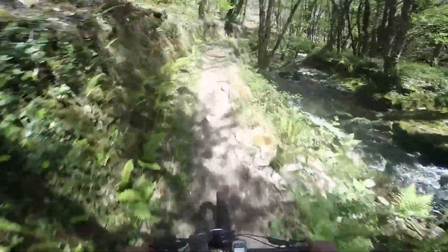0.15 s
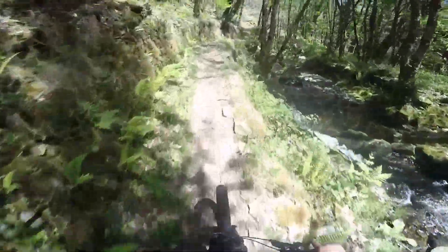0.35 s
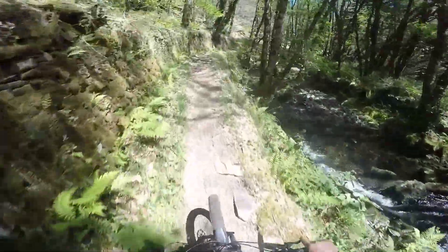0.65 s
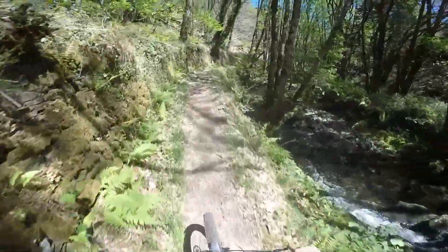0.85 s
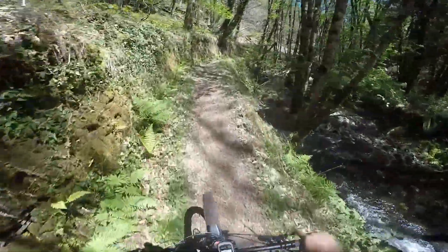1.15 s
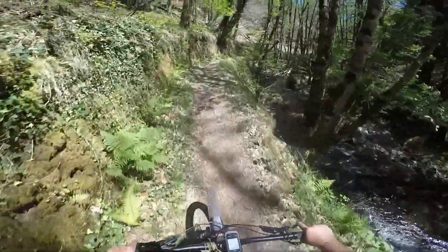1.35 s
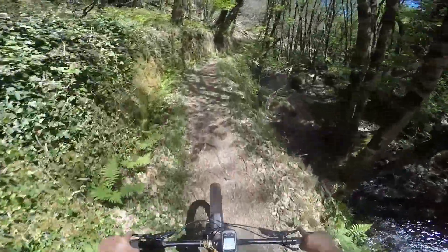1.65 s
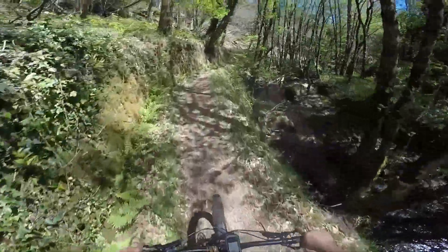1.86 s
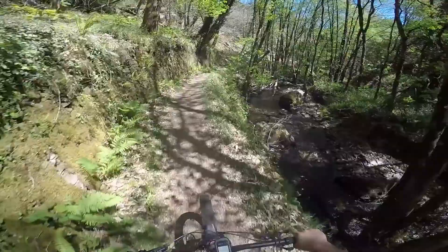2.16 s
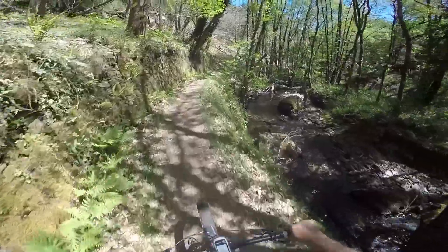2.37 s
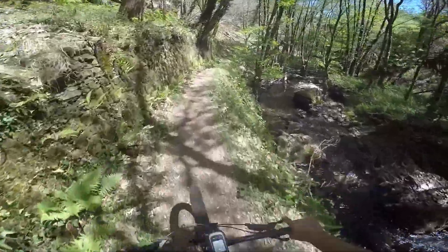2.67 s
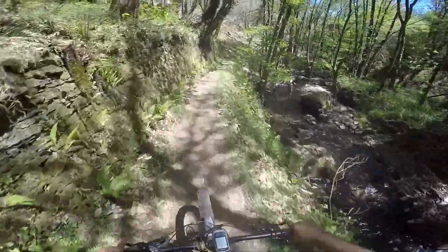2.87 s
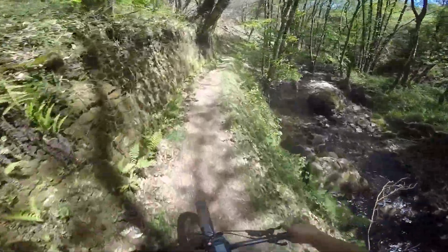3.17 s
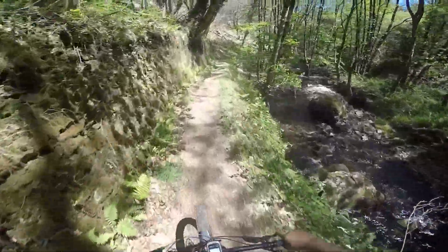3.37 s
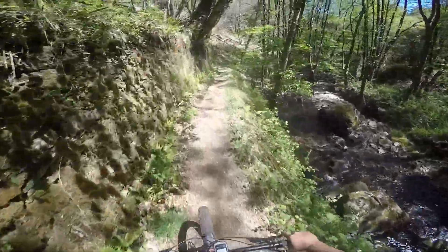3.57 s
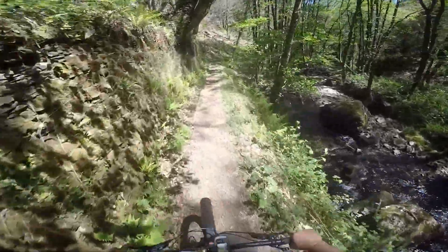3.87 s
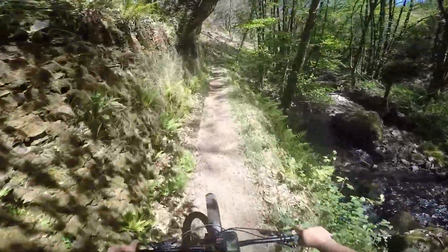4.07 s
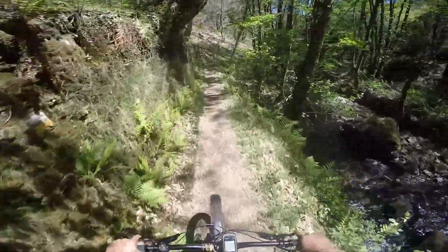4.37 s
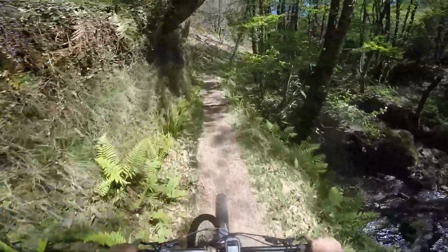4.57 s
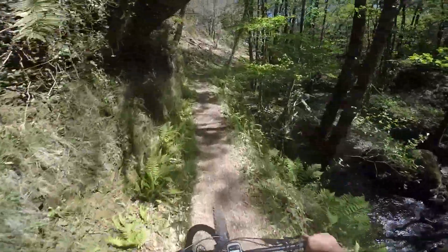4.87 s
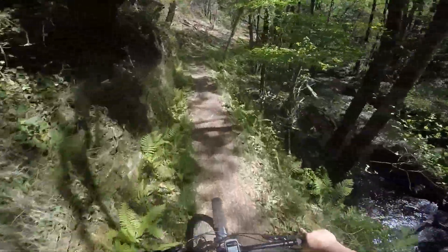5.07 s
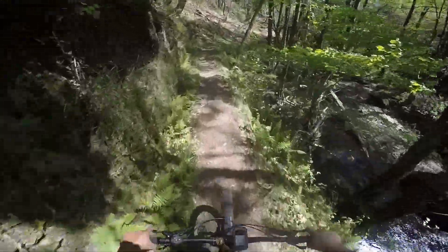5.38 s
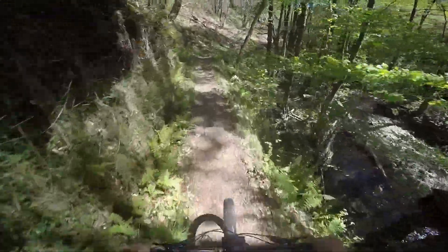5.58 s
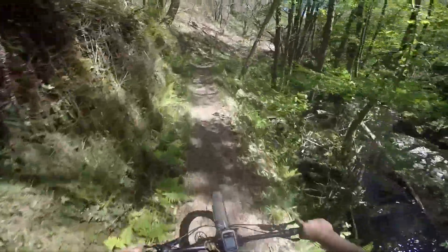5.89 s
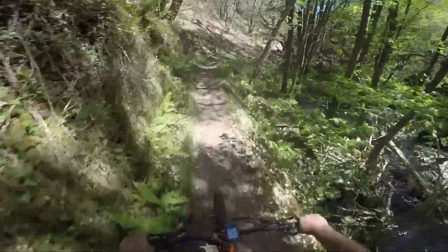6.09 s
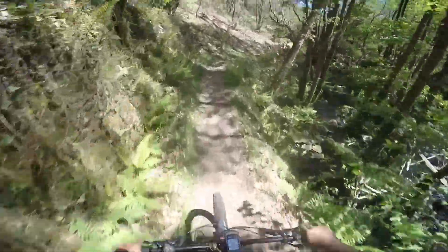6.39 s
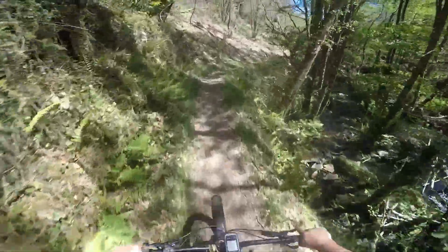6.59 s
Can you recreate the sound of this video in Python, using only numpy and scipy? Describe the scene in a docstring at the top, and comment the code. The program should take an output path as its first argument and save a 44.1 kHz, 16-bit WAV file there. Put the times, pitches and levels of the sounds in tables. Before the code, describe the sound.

Low, gusting wind buffets the microphone as a mountain bike rolls over dirt, with a few clicks, knocks and a faint stream.

```python
"""A mountain bike rolls along a dirt path beside a stream, heard from a camera in a case on the rider.
From the start, turbulent wind rumbles on the microphone over drumming tyres, ringing rims and rushing water.
Hard eddies strike at once, as loose stones crunch and the bike clicks and knocks. A small rapid passes
just after 1 s; around 3 s the tread hums on hard ground, and sharp clicks follow. A far bird chirps
between 4.6 and 6 s, and near the end the wind rises into hard eddies again."""
import sys
import numpy as np
from scipy import signal
from scipy.fft import rfft, irfft, next_fast_len
from scipy.io import wavfile
from scipy.ndimage import map_coordinates

SR = 44100
rng = np.random.default_rng(int(sys.argv[2]) if len(sys.argv) > 2 else 0)


def int16_out(signal):
    """Quantize to a 16-bit WAV file."""
    q = np.round(np.clip(np.atleast_2d(signal).T, -1, 1) * 32767)
    wavfile.write(sys.argv[1], SR, q.astype(np.int16))


N = 297234

# normal modes of the bike's frame: (frequency [Hz], relative level [dB])
FRAME_MODES = [(900, -2), (1130, -5.5), (1330, -0.5), (1500, 3), (1810, -8), (2030, -2), (2320, -6),
               (2900, -9)]


def amp(db):
    """Decibels to amplitude ratio."""
    return 10 ** (np.asarray(db) / 20)


def unit(x):
    """Normalisation to rms 1."""
    return x / np.sqrt(np.mean(x ** 2) + 1e-20)


def curves(rows):
    """Linear interpolation: one value per sample for each column after the time."""
    times, *columns = np.transpose(rows)
    return [np.interp(np.arange(N) / SR, times, column) for column in columns]


def swells(rows):
    """Superposed Gaussian bells from rows of (time [s], half length [s], height)."""
    t = np.arange(N) / SR
    return sum(height * np.exp(-((t - s) / half) ** 2) for s, half, height in rows)


def wobble(rate):
    """Smooth random modulation: a spline through rate Gaussian values a second."""
    knots = rng.standard_normal(int(N * rate / SR) + 4)
    return map_coordinates(knots, [np.arange(N) * rate / SR])


def filtered(x, response):
    """Linear filtering: the spectrum of x times a frequency response."""
    size = next_fast_len(N + SR // 2)
    return irfft(rfft(x, size) * response(np.fft.rfftfreq(size, 1 / SR)), size)[:N]


def coloured(x, spectrum):
    """Spectral shaping by (frequency [Hz], relative level [dB]) points on a log axis, at rms 1."""
    f, db = np.transpose(spectrum)
    return unit(filtered(x, lambda hz: amp(np.interp(np.log(hz + 1), np.log(f + 1), db))))


def turbulence(spectrum, even_s):
    """Random pressure fluctuation, its power evened out over spans longer than even_s."""
    noise = coloured(rng.standard_normal(N), spectrum)
    window = signal.windows.hann(max(int(even_s * SR), 8))
    power = signal.fftconvolve(np.abs(signal.hilbert(noise)) ** 2, window / window.sum(), 'same')
    return unit(noise / np.sqrt(np.abs(power) + 0.018))


def grainy(spectrum, rate, grain_db):
    """Shot noise: tiny impacts of uneven size, rate a second, within steady noise."""
    grains = (rng.random(N) < rate / SR) * rng.standard_normal(N)
    return coloured(rng.standard_normal(N) + amp(grain_db) * unit(grains), spectrum)


def pressure_pulses(rows, rebound=1.3):
    """Wavelets: soft pulses, each with a shallow opposite swing before and after."""
    t = np.arange(N) / SR
    out = np.zeros(N)
    for s, db, hz, direction in rows:
        spread = (np.pi * hz * (t - s)) ** 2
        out += np.sign(direction) * amp(db) * (1 - rebound * spread) * np.exp(-spread)
    return out


def wind():
    """Turbulence: large eddies sway the pressure, small ones buffet, hard ones sweep both aside."""
    # airflow over the microphone: (time [s], level [dB])
    airflow = [(0, -14), (0.05, -15), (0.1, -35), (0.14, -16.5), (0.5, -22), (0.82, -26.5), (1.15, -33.5),
               (1.6, -36), (1.9, -33), (2.35, -30), (2.75, -31.5), (3.1, -40.5), (3.4, -34), (3.9, -35),
               (4.3, -36), (4.7, -35.5), (5.3, -34.5), (6.0, -35.5), (6.25, -24.5), (6.55, -22),
               (6.74, -38.5)]
    # short gusts: (time [s], half length [s], lift [dB])
    gusts = [(0.22, 0.056, -1), (0.29, 0.034, 14), (.64, 0.078, 3), (.79, 0.039, 0), (0.995, 0.028, 4),
             (1.36, 0.11, 5), (1.76, 0.09, 7), (1.92, 0.055, 2.5), (2.8, 0.049, -1), (2.6, .03, 4),
             (2.96, 0.047, 8.5), (3.2, .03, 5), (3.42, 0.039, 2), (3.54, .03, 0), (3.766, 0.045, 3),
             (4.13, 0.038, 4), (4.24, 0.024, 9), (4.42, .04, 0), (4.72, 0.066, 7), (5.02, 0.061, 4),
             (5.24, 0.044, 6), (5.57, 0.03, 6), (5.78, 0.034, 9), (6.176, 0.036, 17), (6.447, 0.016, -6),
             (6.71, 0.021, 6.5)]
    # slack air between gusts: (time [s], half length [s], depth [dB])
    lulls = [(1.13, 0.016, 9), (1.55, 0.058, 1.5), (2.09, 0.025, 8.5), (2.53, 0.061, 6.5), (2.66, 0.021, 4),
             (3.09, 0.058, 4.5), (3.48, .015, 9), (3.67, .02, 4.5), (3.88, 0.046, -1.5), (4.54, 0.029, 9),
             (4.86, 0.037, 4), (5.12, 0.076, 5), (5.42, 0.076, 6.5), (5.93, 0.012, 5), (6.37, 0.054, 4.5),
             (6.64, 0.027, 0)]
    # hard eddies on the case: (time [s], peak [dB], pitch [Hz], direction [1 push, -1 suction])
    eddies = [(.039, -6, 31.7, 1), (0.145, -10, 25.6, 1), (0.177, -8.5, 28.2, -1), (0.207, -8.5, 40.4, 1),
              (.25, -14.5, 33, -1), (0.29, -11, 29.8, 1), (.316, -16, 38, -1), (0.348, -11.5, 37, 1),
              (0.963, -17, 35.7, -1), (1.732, -20.5, 32.3, -1), (1.952, -20, 28, 1), (2.427, -20, 27, -1),
              (2.734, -21, 23.5, 1), (3.361, -23, 29.4, 1), (4.225, -24.5, 27, -1), (5.561, -21, 30.5, -1),
              (6.155, -14.5, 42.4, 1), (6.18, -16.5, 41.4, -1), (6.24, -9.5, 32.7, 1),
              (6.441, -10, 40.6, -1)]
    # spectra of large and small eddies: (frequency [Hz], relative level [dB])
    sway_spectrum = [(4, -8), (10, -0.5), (15, 0.5), (24, -6), (32, -11), (50, -61), (90, -93)]
    buffet_spectrum = [(15, -51), (28, 5.5), (45, -4.5), (60, -5), (75, -9), (88, -18.5), (110, -28),
                       (170, -66), (300, -84), (900, -115)]
    cruise_db, sweep_half_s, sweep_depth_db = -32, 0.019, 6
    gust_db = swells(gusts)
    flow_db = curves(airflow)[0] - cruise_db
    sway_db = -30.5 + flow_db + 0.14 * gust_db + 1.9 * wobble(6.1)
    sway = amp(sway_db) * turbulence(sway_spectrum, even_s=0.12)
    buffet_db = -40 + 0.5 * flow_db + gust_db + 1.5 * wobble(21)
    buffet = amp(buffet_db) * turbulence(buffet_spectrum, even_s=0.16)
    swept_db = swells([(s, sweep_half_s, sweep_depth_db) for s, *_ in eddies])
    flutter_db = wobble(18)
    return (sway + buffet) * amp(flutter_db - swells(lulls) - swept_db) + pressure_pulses(eddies)


def tyres():
    """Rolling contact: random impacts drum, sizzle and crunch; periodic knob strikes hum; stones thud."""
    # drumming on dirt and sizzle of grit: (time [s], level before trim [dB])
    drum_levels = [(0, -56), (0.3, -55), (0.65, -57.5), (0.95, -60.5), (1.6, -61.5), (3.2, -64.5),
                   (4.4, -63.5), (5.45, -65), (5.65, -59.5), (6, -61.5), (6.4, -58), (6.74, -66)]
    grit_levels = [(0, -62.5), (0.5, -64), (1.3, -67), (2.6, -68.5), (5.45, -69), (5.65, -65.5),
                   (6.74, -66.5)]
    # stretches of loose and of hard ground: (time [s], half length [s], level [dB])
    loose_ground = [(0.165, 0.069, -52.5), (0.328, 0.099, -56.5), (6.442, 0.17, -67)]
    hard_ground = [(2.956, 0.42, -70), (3.526, 0.15, -72.5), (5.216, 0.4, -70.5)]
    # bumps over stones: (time [s], peak [dB], pitch [Hz])
    bumps = [(.43, -40, 300), (0.867, -37.5, 248), (1.366, -37.5, 199)]
    # spectra of the contact noises: (frequency [Hz], relative level [dB])
    drum_spectrum = [(50, -13), (100, 9), (130, 8.5), (180, 3.5), (230, 0.5), (275, 0), (330, -2),
                     (400, -1), (500, -2.5), (650, -4.5), (1000, -11), (2500, -53), (8000, -68)]
    grit_spectrum = [(3000, -8), (6000, -5), (8000, 4), (9800, 6), (10800, 5), (12000, 2), (14500, 7),
                     (15400, -33)]
    crunch_spectrum = [(300, -15), (700, -4.5), (1000, -3), (1400, -8), (2000, -7.5), (3000, -14),
                       (5000, -24), (9000, -48)]
    drum_trim_db, grit_trim_db = 1, -6.5
    drum_db = curves(drum_levels)[0] + drum_trim_db + 1.03 * wobble(17)
    drum = amp(drum_db) * grainy(drum_spectrum, rate=150, grain_db=-5.5)
    grit_db = curves(grit_levels)[0] + grit_trim_db + 1.3 * wobble(40)
    grit = amp(grit_db) * grainy(grit_spectrum, rate=220, grain_db=-4.5)
    knob_hz = 275 * (1 + 0.03 * wobble(5.6))
    contact = swells([(s, half, amp(db)) for s, half, db in hard_ground]) * amp(2.5 * wobble(20))
    # uneven ground blurs the knobs' note
    hum = contact * np.sin(2 * np.pi * np.cumsum(knob_hz) / SR + 0.69 * wobble(40))
    looseness = swells([(s, half, amp(db)) for s, half, db in loose_ground])
    crunch = looseness * grainy(crunch_spectrum, rate=240, grain_db=-4)
    thuds = pressure_pulses([(s, db, hz, 1) for s, db, hz in bumps])
    return drum + grit + hum + crunch + thuds


def resonance(f, centre_hz, width_hz):
    """Complex response of a damped oscillator, 1 at its centre frequency."""
    return 1j * f * width_hz / (centre_hz ** 2 - f ** 2 + 1j * f * width_hz)


def rims():
    """Forced vibration: grit and tread keep the rims ringing, each resonance swelling independently."""
    # rim resonances: (frequency [Hz], width of each of two stages [Hz], mean level [dB])
    rim_modes = [(1967, 136, -73), (3620, 130, -74), (10830, 350, -91)]
    out = np.zeros(N)
    for hz, width, db in rim_modes:
        ring = unit(filtered(rng.standard_normal(N), lambda f: resonance(f, hz, width) ** 2))
        out += amp(db + 3 * wobble(10)) * ring
    return out


def stream():
    """Water over rocks gives broadband rush and spray; a rapid's gurgle obeys the inverse-distance law."""
    # the stream's strength before trims: (time [s], body level [dB], spray level [dB])
    water_levels = [(0, -51, -54.5), (0.35, -53.5, -54.5), (0.75, -53.5, -55.5), (0.97, -51.5, -53.5),
                    (1.12, -55.5, -55.5), (1.4, -53.5, -56.0), (2.1, -56.5, -58.5), (3.8, -58.5, -59),
                    (5.1, -58, -60.5), (5.5, -56.5, -59.5), (6.74, -57, -59)]
    # spectra of the water: (frequency [Hz], relative level [dB])
    body_spectrum = [(250, -26), (550, -6.5), (720, -2.5), (860, 0), (980, -6.5), (1130, -5.5), (1280, 3),
                     (1950, 0.5), (2600, -2), (3400, -15.5), (6000, -32.5)]
    spray_spectrum = [(1500, -39), (2600, -2.5), (3200, 1.5), (3900, 2.5), (4400, -4.5), (5500, -7.5),
                      (7500, -10.5), (9000, -16.5), (12000, -25), (15400, -37)]
    gurgle_spectrum = [(450, -23), (650, -3), (740, -5), (810, 0), (880, -1.5), (980, -13.5), (1300, -26.5)]
    body_trim_db, spray_trim_db = -3, -3.5
    nearest_s, passing_s, nearest_db = 1.25, 0.43, -63.5
    body_db, spray_db = curves(water_levels)
    body_gain = amp(body_db + body_trim_db + 0.97 * wobble(21.995))
    body = body_gain * grainy(body_spectrum, rate=440, grain_db=-9.5)
    spray_gain = amp(spray_db + spray_trim_db + 0.73 * wobble(21))
    spray = spray_gain * grainy(spray_spectrum, rate=250, grain_db=-8)
    distance = np.hypot(1, (np.arange(N) / SR - nearest_s) / passing_s)  # 1 at closest approach
    gurgle = amp(nearest_db) / distance * grainy(gurgle_spectrum, rate=140, grain_db=-11.5)
    return body + spray + gurgle


def clicks():
    """Hard impact: chain and grit on metal excite a broadband snap, a short ring and a frame knock."""
    # contacts: (time [s], peak [dB], ring [Hz], t60 [s], snap gain [dB], snap edge [Hz], knock gain [dB])
    contacts = [(.1185, -43.5, 5240, .008, -17, 6000, -30), (.585, -43.5, 4000, 0.021, -5, 3500, -30),
                (1.048, -48, 5400, .008, -15, 6000, -30), (1.746, -44, 6550, 0.013, 3, 9000, -30),
                (1.893, -47, 6900, .007, -5, 9000, -30), (3.2055, -32, 7970, 0.015, 1.5, 13000, -35),
                (3.2058, -41, 12700, .01, 0, 13000, -35), (3.2059, -36, 3130, .006, -4, 9000, -35),
                (3.2069, -33, 2440, 0.007, -5, 7000, -35), (3.2112, -39, 4400, 0.016, 1, 9000, -35),
                (3.3397, -33, 3530, 0.02, -7, 13000, -35), (3.3402, -34.5, 7700, .006, 0, 13000, -35),
                (3.3416, -36.5, 4780, 0.015, -3, 13000, -30), (3.3455, -37, 2050, 0.024, 2, 9000, -24),
                (4.288, -30, 1960, 0.009, -7, 6000, -2.5), (4.2883, -30.5, 3100, 0.0068, 7, 12000, -18),
                (5.797, -45, 2460, .014, -8, 3000, -20), (6.32, -45, 1960, 0.017, -10, 2500, -25)]
    # (frequency [Hz], relative level [dB])
    crack_spectrum = [(300, -30), (800, -9), (2500, 11), (5000, -0.5), (6200, -3), (8300, 4),
                      (10000, -1), (13500, -9), (15000, 0)]
    out, t = np.zeros(N), np.arange(SR // 20) / SR
    crack = coloured(rng.standard_normal(N), crack_spectrum)
    knock = 0.5 * np.sin(2 * np.pi * FRAME_MODES[0][0] * t) * (1 - np.exp(-t / 0.00074))
    attack = 1 - np.exp(-t / 0.000072)
    hardness = 0.5 + 0.5 * np.exp(-t / 0.0005)  # the snap is strongest in the first instant
    for k, (s, db, hz, t60, snap_db, edge_hz, knock_db) in enumerate(contacts):
        ring = 0.6 * np.sin(2 * np.pi * hz * t)
        lowpass = signal.butter(1, edge_hz, fs=SR)
        highpass = signal.butter(2, 0.63 * hz, 'high', fs=SR)
        burst = signal.lfilter(*lowpass, crack[k * len(t):][:len(t)])
        snap = signal.lfilter(*highpass, amp(snap_db) * burst * hardness)
        click = (ring + snap + amp(knock_db) * knock) * amp(-60 * t / t60) * attack
        add(out, s, amp(db) * click / np.abs(click).max())
    return out


def knocks():
    """Modal ringing: each jolt excites the frame's modes, most strongly near its own tone, over a thud."""
    # jolts over bumps: (time [s], peak [dB], t60 [s], tone [Hz])
    jolts = [(0.1415, -40, 0.034, 1600), (0.1793, -32, 0.012, 1200), (0.185, -41, .02, 2900),
             (0.2056, -33, 0.02, 2400), (0.208, -40.5, .025, 750), (0.215, -40, .018, 1050),
             (0.312, -40.5, 0.04, 1500), (0.357, -40, 0.021, 1600), (1.1973, -35, 0.044, 1500),
             (1.2042, -30.5, 0.024, 1750), (1.2092, -38, 0.078, 1550), (4.896, -46, 0.03, 2000),
             (6.3108, -44.5, 0.017, 2400), (6.45, -47, 0.025, 600)]
    # modes of the frame's hollow body: (frequency [Hz], relative level [dB])
    body_modes = [(430, -18), (560, -16), (690, -16)]
    out, t = np.zeros(N), np.arange(SR // 10) / SR
    hz, mode_db = np.transpose(FRAME_MODES)[:, :, None]
    thud = sum(amp(db) * np.sin(2 * np.pi * body_hz * t) for body_hz, db in body_modes)
    attack = 1 - np.exp(-t / 0.0004)  # softened by the padded contact
    for s, db, t60, tone_hz in jolts:
        scatter_db, phase = rng.standard_normal((2, len(FRAME_MODES), 1))
        focus_db = -10 * np.log2(hz / tone_hz) ** 2
        modes = amp(mode_db + focus_db + scatter_db) * np.sin(2 * np.pi * hz * t + 2 * phase)
        ring = (unit(modes.sum(axis=0)) + thud) * amp(-60 * t / t60) * attack
        add(out, s, amp(db) * ring / np.abs(ring).max())
    return out


def bird():
    """Scattering: trees blur the phase of a distant bird's thin, falling notes."""
    # notes: (time [s], length [s], start pitch [Hz], end pitch [Hz], peak [dB])
    notes = [(4.66, 0.088, 6650, 6550, -72), (4.845, 0.07, 6300, 5400, -66.5),
             (4.945, .04, 4650, 4350, -69), (5.915, .05, 5300, 4700, -67)]
    blur_rad = 0.78
    out = np.zeros(N)
    for s, length, start_hz, end_hz, db in notes:
        count = int(length * SR)
        hz = np.linspace(start_hz, end_hz, count) * (1 + 0.03 * wobble(610)[:count])
        phase = 2 * np.pi * np.cumsum(hz) / SR + blur_rad * wobble(880)[:count]
        envelope = np.sin(np.linspace(0, np.pi, count))
        add(out, s, amp(db) * envelope * np.sin(phase))
    return out


def add(track, s, sound):
    """Superpose a sound on the track at time s."""
    part = track[max(round(s * SR), 0):][:len(sound)]
    part += sound[:len(part)]


def scene():
    """Superposition: the pressures of wind, bike, stream and bird sum in one channel."""
    return (wind() + tyres() + rims() + stream() + knocks() + clicks() + bird())[None]


def record(dry):
    """Resonance and band limiting: the case colours the sound and the camera cuts the highest treble."""
    # resonances of the case: (frequency [Hz], width [Hz], lift [dB])
    case_modes = [(842, 72, 0.5), (1080, 180, 1.5), (1240, 94, 1), (1913, 170, 3), (3076, 86, 4),
                  (3550, 77, 3.5), (4184, 65, 4.5), (4814, 100, 7), (5590, 97, 5), (6920, 91, 5),
                  (8100, 180, 2.5), (10800, 280, 2.5), (14250, 350, 0)]
    band_limit_hz = 15350

    def response(f):
        lift = sum((amp(db) - 1) * resonance(f, hz, width) for hz, width, db in case_modes)
        return (1 + lift) * (f < band_limit_hz)

    return filtered(dry[0], response)[None]


dry = scene()
out = record(dry)
int16_out(out)
```